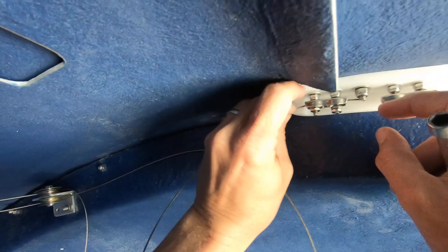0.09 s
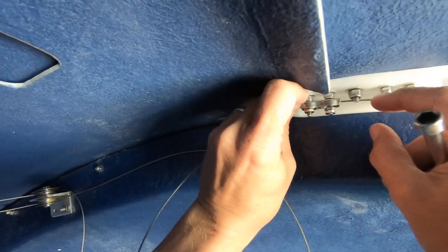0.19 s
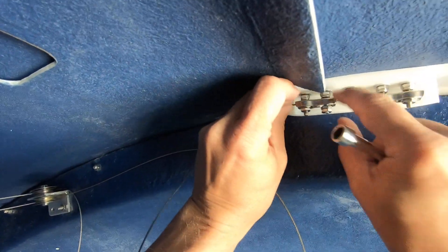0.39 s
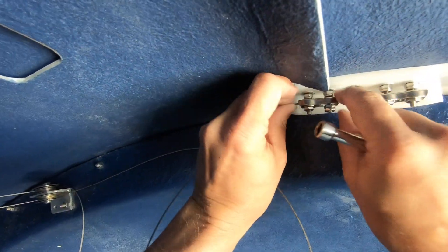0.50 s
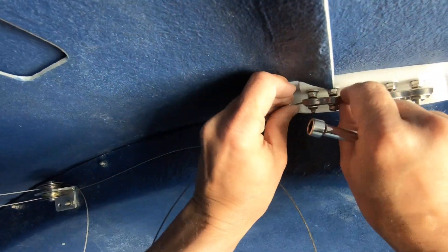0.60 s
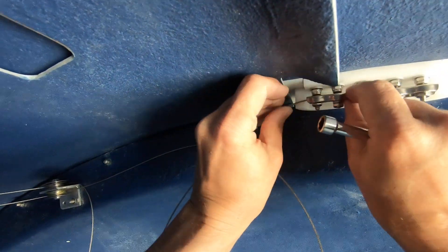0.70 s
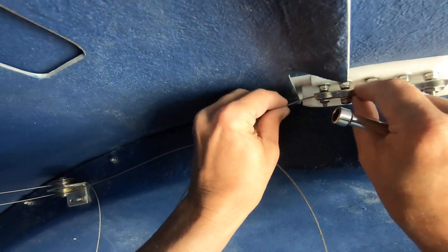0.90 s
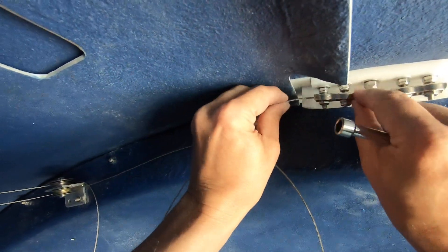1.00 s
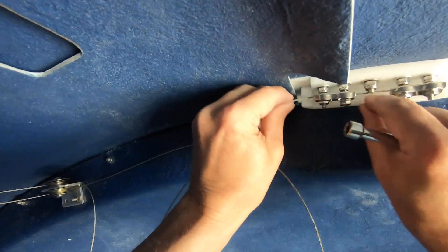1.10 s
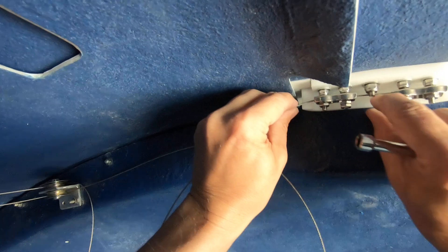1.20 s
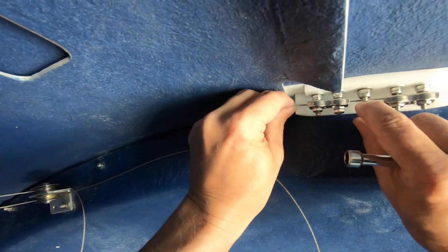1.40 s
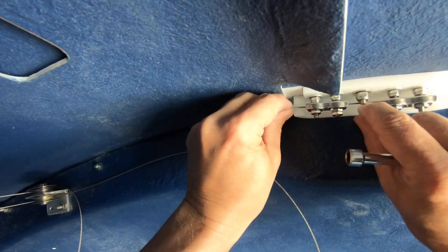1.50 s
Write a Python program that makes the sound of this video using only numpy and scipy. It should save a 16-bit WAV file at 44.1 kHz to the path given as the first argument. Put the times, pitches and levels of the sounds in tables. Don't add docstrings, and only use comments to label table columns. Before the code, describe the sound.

Close stereo pickup of irregular metal ticks from pulleys and a bracket, fine cable scrape, soft hand rubbing and hollow panel knocks; a lull midway, a loud clack near the end, short room decay.

```python
import sys
import numpy as np
from scipy import signal
from scipy.fft import rfft, irfft
from scipy.io import wavfile
from scipy.ndimage import uniform_filter1d

SR = 44100
rng = np.random.default_rng(int(sys.argv[2]) if len(sys.argv) > 2 else 0)


def bounce(signal):
    frames = np.transpose(np.atleast_2d(signal))
    limited = np.clip(frames, -1, 1)
    pcm = np.round(limited * 32767).astype(np.int16)
    wavfile.write(sys.argv[1], SR, pcm)


def field_ratio(decibels):
    return 10 ** (np.asarray(decibels, dtype=float) / 20)


N = 68355
T = np.arange(N) / SR
SMALL_PITCH = 1.17

# f/Hz, level/dB, decay time t60/s
PULLEY = [(3860, -16.5, 0.0013), (4540, -6.5, 0.011), (5330, -25.5, 0.011), (6165, 13, 0.004),
          (6855, 4.5, 0.011), (7570, 4, 0.0074), (9290, 2, 0.0023), (12270, 1, 0.0019)]
# f/Hz, level/dB, decay time t60/s
BRACKET = [(1415, 1.5, 0.013), (2214, -10.5, 0.015), (2470, 3.5, 0.0085), (2920, -0.5, 0.0036),
           (3780, -5, 0.0023)]
# f/Hz, level/dB, decay time t60/s
PANEL = [(155.8, 0, 0.15), (209.7, -7, 0.077), (221.7, 1.5, 0.14), (294.5, 3, 0.094), (361.8, -5.5, 0.08),
         (439, -7.5, 0.013), (491, -13, 0.04), (599, -12.5, 0.14), (755, -12, 0.047)]


def curve(table, col):
    return np.interp(T, [row[0] for row in table], [row[col] for row in table])


def unit(x):
    return x / np.sqrt(np.mean(x ** 2) + 1e-18)


def shape(x, table, phase=False):
    log_f = np.log(np.arange(N // 2 + 1) * SR / N + 1)
    value = np.interp(log_f, np.log([row[0] for row in table]), [row[1] for row in table])
    response = np.exp(1j * value) if phase else field_ratio(value)
    return irfft(rfft(x) * response, N)


def ring(x, modes, scatter=None):
    out = 0
    for k, (hz, db, t60) in enumerate(modes):
        level_dev, pitch_dev = (0, 0) if scatter is None else scatter[k]
        radius = np.exp(-np.log(1000) / (t60 * SR))
        pole = radius * np.exp(2j * np.pi * hz * (1 + 0.012 * pitch_dev) / SR)
        y = signal.lfilter([1], [1, -pole], x).imag
        if scatter is None:
            y = y * (1 - radius)
        else:
            y = unit(y) * np.sqrt(1 - radius)
        out = out + field_ratio(db + 1.5 * level_dev) * y
    return out


def add(out, x, start_s):
    i = max(int(start_s * SR), 0)
    out[..., i:i + x.shape[-1]] += x[..., :N - i]


def walk(rate_hz):
    k = int(SR / rate_hz)
    steps = np.repeat(rng.standard_normal(N // k + 1), k)
    return unit(uniform_filter1d(steps, k)[:N])


def ticks():
    # t/s, peak level/dB, bracket share/dB, burst length/ms
    small_ticks = [(0.2009, -26, -22, 1.1), (0.2144, -24.5, -33, 0.52), (0.2554, -27.5, -22, 0.99),
                   (0.2635, -14, -39, 0.82), (0.3162, -20, -16, 2.05), (0.3224, -32, -4, 0.82),
                   (0.7514, -37.5, -1.5, 0.85), (1.0884, -29, -10, 1.9), (1.1114, -28, -19, 1.5),
                   (1.2635, -23, -13, 1), (1.1925, -16.5, -30, 0.85), (1.203, -16, -39.5, 2)]
    other_ticks = [(0.0014, -28, 1, 2.5), (0.0117, -32, -13.5, 5.6), (0.1565, -22, -2, 0.48),
                   (0.1666, -34.5, 8.5, 2.04), (0.1797, -30, 1, 1.5), (0.1924, -21.5, -21, 0.46),
                   (0.2082, -20, -6.5, 0.84), (0.3102, -22.5, -7.5, 1.6), (0.4838, -44, -22, 3.1),
                   (0.6, -32.5, 3, 2.8), (0.6435, -24, 0.5, 1.96), (0.6495, -26, -20, 1.8),
                   (0.721, -50.5, 5.5, 4.8), (0.7401, -39, -3, 3), (.746, -30.5, -11, 0.69),
                   (0.7594, -33.5, -26, 0.36), (0.8226, -48, -2, 1.3), (0.827, -37.5, -25, 0.82),
                   (0.9012, -35.5, 10, 2.6), (0.9862, -46.5, -4, 2.5), (1.0173, -40, 1, 1.4),
                   (1.0465, -13, -6, 2.7), (1.0515, -36, 6, 1.5), (1.1, -30, 6, 2), (1.1914, -27, -11, 5.3),
                   (1.202, -6, -41, 1.56), (1.2567, -26, -7.5, 8.3), (1.2676, -26, -19, 1.6),
                   (1.2988, -31, 1.5, 0.57),
                   (0.082, -42.5, 6.5, 3.2), (0.097, -42, 7, 0.61), (.111, -42.5, 9, 2.1),
                   (.13, -38, 8, 0.91), (0.146, -35, 5, 2.6), (0.276, -31.5, -32.5, 1.4),
                   (.43, -44.5, -17, 2.1), (.544, -47, 3, 1.5), (.624, -34, -1, 1.7), (.658, -35, -23, 2.5),
                   (0.914, -41.5, -7, 1.6), (1.12, -40, 4, 0.68), (1.142, -37.5, 3, 1.2),
                   (1.186, -35.5, -6, 1.3), (1.2036, -15.5, -32, 1.1), (1.2105, -33, -3.5, 2.2),
                   (1.22, -34, -5, 0.54), (1.229, -31, -16, 2), (1.235, -43, -14, 1.1),
                   (1.355, -53, 15, 1.1)]
    groups = (
        (small_ticks, SMALL_PITCH, 18),
        (other_ticks, 1, 0.5),
    )
    out, t = np.zeros((2, N)), T[:3000]
    for rows, pitch, pan_db in groups:
        pan = field_ratio(np.array([[pan_db], [-pan_db]]) / 2)
        for start_s, db, share_db, ms in rows:
            noise = rng.standard_normal((2, len(t)))
            scatter = rng.standard_normal((len(PULLEY) + len(BRACKET), 2))
            hard_db = 0.08 * (db + 7.5)
            modes = [(hz * pitch, g + hard_db * (hz > 8500), t60) for hz, g, t60 in PULLEY]
            u = t / (max(ms, .2) / 1000)
            envelope = u * np.exp(-u) + 0.058 * np.exp(-t / 0.013)
            burst = noise[0] * (.5 + np.abs(noise[1])) * envelope
            wheel = ring(burst, modes, scatter)
            mount = ring(burst, BRACKET, scatter[len(PULLEY):])
            x = wheel / np.abs(wheel).max() + field_ratio(share_db) * mount / np.abs(mount).max()
            add(out, field_ratio(db) * x * pan, start_s - .001)
    return out


def scrape():
    # t/s, level/dB, bracket share/dB
    effort = [(0, -40, -6), (.07, -52, -5), (.095, -49.5, 3.5), (.165, -41.5, -2), (.22, -37.5, 0),
              (.25, -53, 10), (.33, -43, -11), (.4, -72, -13), (.6, -67.5, 0), (.66, -62, -2.5),
              (.86, -79, 4), (1.03, -68, 11), (1.06, -45, -26), (1.17, -47, -4), (1.22, -52, -28),
              (1.247, -43.5, -6), (1.3, -49, -8.5), (1.4, -65.5, -2)]
    grains_per_s, grain_db = 1300, 1.5
    z = rng.random((3, N))
    strength = field_ratio(-grain_db * np.log(z[2] + 0.049))
    grains = (z[0] < grains_per_s / SR) * np.sign(z[1] - .5) * strength
    hiss = 0.83 * rng.standard_normal((2, N))
    drive = (unit(grains) + hiss) * field_ratio(4.3 * walk(59.88))
    small_modes = [(hz * SMALL_PITCH, db, t60) for hz, db, t60 in PULLEY]
    wheels = unit(ring(drive, PULLEY)) + 0.67 * unit(ring(drive, small_modes))
    mount = field_ratio(curve(effort, 2)) * unit(ring(drive, BRACKET))
    return field_ratio(curve(effort, 1)) * (wheels + mount)


def knocks():
    # t/s, peak level/dB, brightness/dB, tail/ms, favoured mode f/Hz
    blows = [(0.237, -21, -12, 14, 136), (0.314, -27, 4.5, 58, 565), (0.419, -26, 2, 37, 230),
             (0.429, -28, -11, 36, 493), (0.478, -23, -10, 35, 323), (0.538, -35, -21, 40, 340),
             (0.583, -23, -13, 15, 280), (0.899, -27.5, 4.5, 45, 500), (0.909, -33, 11.5, 44, 540),
             (1.043, -18.5, 0, 76, 276), (1.118, -17.5, -3.5, 41, 226), (1.131, -14.5, -13.5, 53, 397),
             (1.143, -22.5, -13, 22, 600), (1.122, -17.5, -20, 12, 520), (1.161, -27.5, -18, 51, 454),
             (1.175, -20, -13, 32, 362), (1.2, -30.5, -14, 28, 303), (1.257, -27.5, 3, 33, 195)]
    spot_db, spot_octaves = 21.5, .2
    band = signal.butter(4, (723, 2190), "band", fs=SR, output="sos")
    out, t = np.zeros(N), T[:12000]
    for start_s, db, bright_db, ms, spot_hz in blows:
        modes = []
        for hz, g, t60 in PANEL:
            distance = np.log2(hz / spot_hz) / spot_octaves
            modes.append((hz, g + spot_db * np.exp(-distance ** 2), t60))
        burst = rng.standard_normal(len(t)) * np.exp(-t / (max(ms, 1) / 1000))
        scatter = rng.standard_normal((len(PANEL), 2)) * 0.41
        body = ring(burst * (1 + 4.3 * np.exp(-t / 0.0099)), modes, scatter)
        edge = signal.sosfilt(band, burst * (1 + 4.3 * np.exp(-t / 0.0017)))
        x = body / np.abs(body).max() + field_ratio(bright_db) * edge / np.abs(edge).max()
        add(out, field_ratio(db - 3) * x, start_s + 0.001167)
    return out


def pushes():
    # t/s, level/dB, f/Hz, length/s
    booms = [(.11, -36, 202.5, 0.138), (0.214, -32.5, 89.4, 0.04), (0.295, -30, 41.8, 0.043),
             (.588, -18.5, 126, 0.032), (0.599, -14.5, 70, 0.061), (0.635, -25.5, 35.3, 0.056),
             (0.659, -29.5, 135.4, 0.036), (0.703, -33.5, 114.6, 0.091), (0.743, -31, 37.5, 0.11),
             (0.786, -45, 105.6, 0.12), (.91, -27.5, 144, 0.025), (0.932, -25.5, 69, 0.062),
             (1.12, -39.5, 145, 0.052), (1.21, -36.5, 109, 0.052), (1.237, -45, 57.4, 0.18),
             (1.42, -42.5, 59, 0.061), (.86, -44, 45, 0.039)]
    out, t = np.zeros(N), T[:12000]
    for start_s, db, hz, length in booms:
        u = np.minimum(t / length, 1)
        swell = np.sin(np.pi * u ** 0.68)
        add(out, field_ratio(db) * swell * np.sin(2 * np.pi * hz * t * (1.1 - 0.15 * u)), start_s)
    return out


def rubbing():
    # t/s, level/dB
    strokes = [(0, -31), (.07, -39), (.18, -36.5), (.3, -34.5), (.41, -42.5), (.43, -28), (.6, -29.5),
               (.7, -41.5), (.76, -51.5), (.88, -49.5), (.92, -23.5), (1.03, -38), (1.13, -26),
               (1.22, -28.5), (1.4, -42.5), (1.55, -54)]
    rub = unit(ring(rng.standard_normal(N) * field_ratio(2.4 * walk(39.8)), PANEL))
    band = signal.butter(2, [25, 130], "band", fs=SR, output="sos")
    low = unit(signal.sosfilt(band, rng.standard_normal((2, N))))
    return field_ratio(curve(strokes, 1) - 4.5) * (rub + field_ratio(-8.5 + 1.5 * walk(12)) * low)


def room(x):
    t60_s, t = 0.39, T[:20000]
    z = rng.standard_normal((2, len(t)))
    dull = signal.lfilter([.3], [1, -.7], z)
    decay = np.exp(-np.log(1000) * t / t60_s) * np.minimum(t / 0.0024, 1)
    tail = (dull + .5 * z * np.exp(-t / 0.029)) * decay
    tail = tail / np.sqrt(np.sum(tail ** 2, axis=1, keepdims=True))
    return signal.fftconvolve(x[None], tail, axes=1)[:, :N]


def bird():
    # t/s, f/Hz, level/dB
    chirp = [
        (1.42, 3195, -69),
        (1.465, 3750, -73),
        (1.494, 4600, -66),
        (1.505, 5500, -74),
        (1.528, 6220, -62),
        (1.54, 6300, -75),
    ]
    gate = np.clip(np.minimum(T - chirp[0][0], chirp[-1][0] - T) / .006, 0, 1)
    hz = uniform_filter1d(curve(chirp, 1), size=200) * (1 + .012 * walk(200))
    angle = 2 * np.pi * np.cumsum(hz) / SR
    undertone = np.clip((T - 1.515) / .03, 0, .4) * np.sin(angle / 2)
    return gate * field_ratio(curve(chirp, 2) + 3 + 3 * walk(150)) * (np.sin(angle) + undertone)


def still_air():
    # f/Hz, level/dB
    air_spectrum = [(18, -34), (30, 12.5), (71, -42), (116, -5), (296, -1), (716, -34.5), (2430, -28),
                    (6040, -38.5), (15000, -96)]
    z = np.array([unit(shape(rng.standard_normal(N), air_spectrum)) for _ in range(3)])
    return field_ratio(-49 + 1.6 * walk(4.27)) * (z[0] + .5 * z[1:])


def scene():
    steel = ticks() + scrape()
    board = knocks() + pushes() + rubbing()
    air = still_air()
    wet = room(steel.mean(axis=0) + 0.33 * board.mean(axis=0))
    far_bird = bird() * field_ratio(np.array([[-3], [3]]))
    return steel + board + far_bird + air + field_ratio(-8.5) * wet


def band_limit(x):
    return signal.sosfilt(signal.butter(12, 15850, fs=SR, output="sos"), x)


def record(dry):
    # f/Hz, level/dB
    port_level = [(30, -4), (85, -9), (170, -3), (350, -5), (650, -10), (1100, 0), (3000, -2), (8000, -1)]
    # f/Hz, phase/rad
    port_phase = [(340, -.2), (860, 1.6), (1550, 1.4), (5200, 0), (6000, .3), (7000, -2.2), (8400, -4.3),
                  (12000, -5.3)]
    # f/Hz, level/dB
    mic_response = [(8000, -0.5), (9000, -11), (13000, -20.5), (16000, -34)]
    left = shape(dry[0], [(hz, db / 2) for hz, db in port_level])
    left = shape(left, port_phase, phase=True)
    right = shape(dry[1], [(hz, -db / 2) for hz, db in port_level])
    mix = np.array([shape(left, mic_response), shape(right, mic_response)])
    return band_limit(mix)


dry = scene()
out = record(dry)
bounce(out)
```